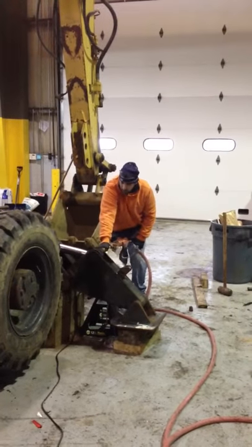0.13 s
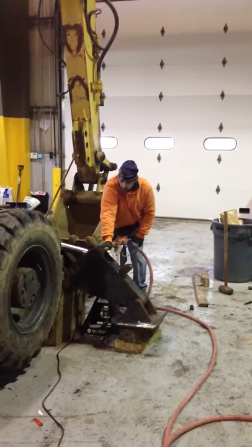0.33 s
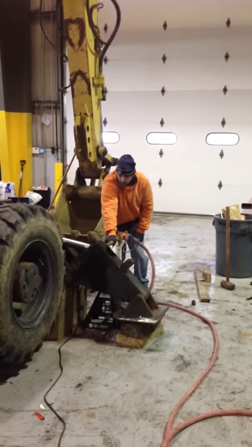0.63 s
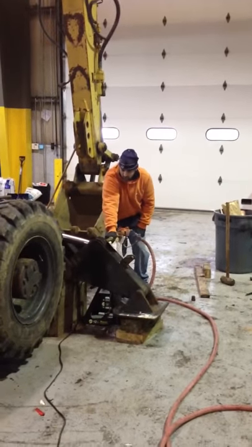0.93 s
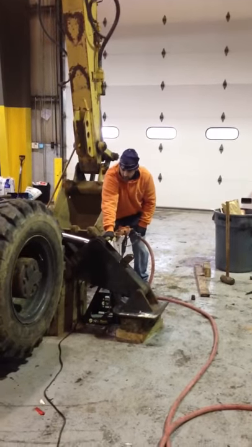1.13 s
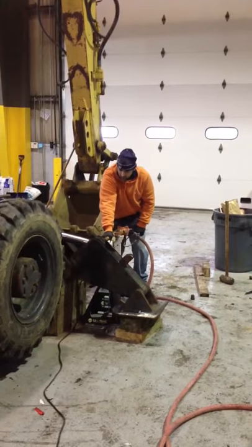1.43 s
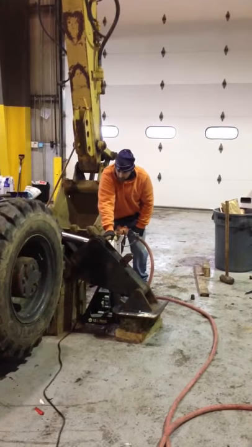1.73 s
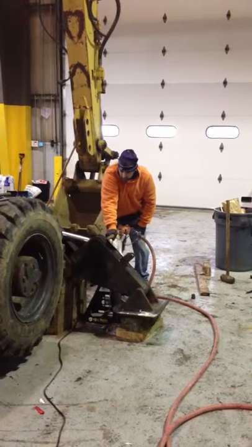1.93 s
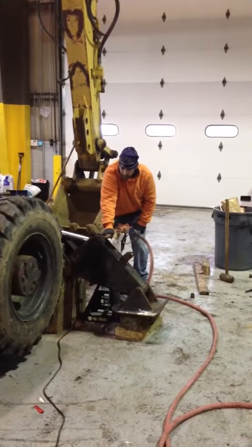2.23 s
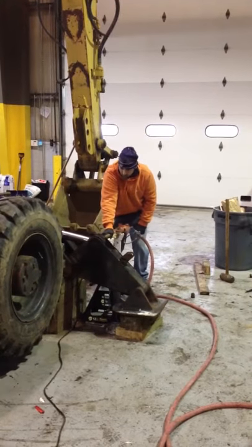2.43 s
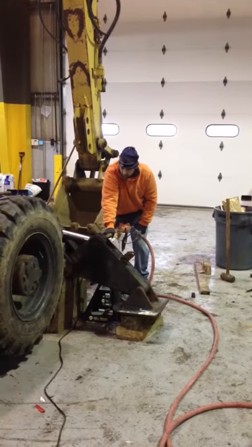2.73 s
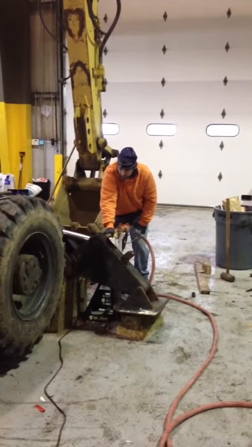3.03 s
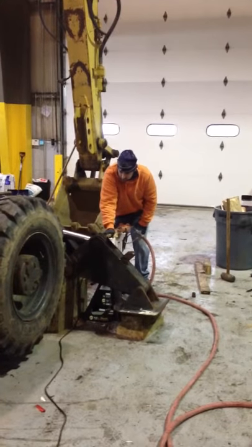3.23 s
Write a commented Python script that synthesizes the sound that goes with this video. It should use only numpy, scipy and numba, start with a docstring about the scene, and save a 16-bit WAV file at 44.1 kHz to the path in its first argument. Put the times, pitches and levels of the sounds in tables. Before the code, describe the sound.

Fast pneumatic blows with sharp metallic clanks and bursts of exhaust air; a short pause leaves ringing, leaking air and low hum, then louder hammering resumes. Reverberant hall, single microphone with automatic level.

```python
"""In a large workshop an air hammer pounds a steel pin on a digger, in two bursts with a short pause.
Each stroke is an impulse that knocks on the steel (noise bursts, damped modes) and vents air twice (puff, jet).
Square hits excite the resonances of the bit and clank the frame; the steelwork and the pin ring on as long modes.
Behind lie an air leak (coloured noise) and mains hum (two sines), which swell in the pause as the
automatic gain recovers."""
import sys
import numpy as np
from scipy import signal
from scipy.fft import rfft, irfft
from scipy.io import wavfile
from scipy.ndimage import uniform_filter1d
from numba import njit

SR = 44100
rng = np.random.default_rng(int(sys.argv[2]) if len(sys.argv) > 2 else 0)


def dump(signal):
    """Clip the signal to [-1, 1] and save it as 16-bit WAV at the path in sys.argv[1]."""
    limited = np.clip(np.atleast_2d(signal).T, -1, 1)
    pcm = np.round(limited * 32767).astype(np.int16)
    wavfile.write(sys.argv[1], SR, pcm)


N = 148617  # length [samples]
T = np.arange(N) / SR  # time [s]


def undb(db):
    """Decibel law: amplitude gain from a level in dB."""
    return 10 ** (np.asarray(db) / 20)


def level(x, db):
    """Mean-square level: scale x to the given rms."""
    return x * undb(db) / np.sqrt(np.mean(x ** 2))


def noise():
    """White noise: equal power at all frequencies."""
    return rng.standard_normal(N)


def walk(rate):
    """Slow random fluctuation: smoothed random steps, rate per second, with a spread near 1."""
    hold = int(SR / rate)
    steps = np.repeat(noise()[:N // hold + 1], hold)
    return level(uniform_filter1d(steps, hold)[:N], 0)


def conv(x, response):
    """Circular convolution: tails wrap round, so the work is already under way at the start."""
    return irfft(rfft(x) * rfft(response, N), N)


def colour(x, points):
    """Minimum-phase filtering: a causal response of the given (frequency [Hz], gain [dB]) curve."""
    hz, db = np.array(points).T
    size = 4096
    f = np.maximum(np.fft.rfftfreq(size, 1 / SR), 1)
    gain = undb(np.interp(np.log(f), np.log(hz), db))
    # folding the cepstrum onto positive time makes the response causal
    cepstrum = irfft(np.log(gain))
    cepstrum[1:size // 2] *= 2
    cepstrum[size // 2 + 1:] = 0
    return conv(x, irfft(np.exp(rfft(cepstrum))))


def taps(events):
    """Impulse excitation: one impulse per (time [s], level [dB]) row."""
    s, db = np.array(events).T
    return np.bincount(np.abs(s * SR).astype(int), undb(db), N)[:N]


def swell(hits, rise_s, fall_s):
    """Energy summation: each impulse rises quickly and decays exponentially, and the energies add."""
    shape = (1 - np.exp(-T / rise_s)) * np.exp(-T / fall_s)
    return np.sqrt(np.abs(conv(hits ** 2, shape ** 2)))


def ring(x, hz, width_hz):
    """Damped resonance: the wider its bandwidth, the faster it decays."""
    return conv(x, np.exp(-np.pi * width_hz * T) * np.sin(2 * np.pi * hz * T))


# runs of even strokes: (first blow [s], last blow [s], rate [blows/s], blow level [dB], exhaust level [dB])
STROKE_RUNS = [(0.019, 0.343, 27.2, 2.5, 1), (0.387, 0.42, 25, -10, -10.5), (0.518, 0.628, 27.1, 2, -2),
               (0.661, 0.791, 29.8, -4.5, 0.5), (0.829, 1.005, 28.6, -4.5, 0.5),
               (1.732, 1.798, 27.4, 7, 4.5), (1.834, 2.151, 27.5, 3, 4), (2.202, 2.488, 28.8, 2, 1.5),
               (2.52, 2.664, 28, 2, 0.5), (2.696, 2.774, 26, -1.5, 3.5), (2.805, 3.121, 28.6, 0.5, -1),
               (3.156, 3.368, 29.2, 0, -0.5)]
JITTER_S, SCATTER_DB = .0008, 2  # random spread of time and level
VENT_DELAY_S = 0.00076
RETURN_SHARE, RETURN_DB = 0.521, -4.5  # second vent: fraction of the cycle, level relative to the first


def strokes():
    """Reciprocating cycle, slightly uneven: a blow and a vent, then a second vent as the piston returns."""
    blows, vents = [], []
    for first, last, rate, blow_db, air_db in STROKE_RUNS:
        count = int(round((last - first) * rate)) + 1
        for s in np.linspace(first, last, count):
            c = rng.standard_normal(5)
            s = s + JITTER_S * c[0]
            back = s + RETURN_SHARE / rate + JITTER_S * c[3]
            blows.append((s, blow_db + SCATTER_DB * c[1]))
            vents.append((s + VENT_DELAY_S, air_db + SCATTER_DB * c[2]))
            vents.append((back, air_db + RETURN_DB + SCATTER_DB * c[4]))
    return taps(blows), taps(vents)


# colour of the blow's crack: (frequency [Hz], relative gain [dB])
KNOCK_COLOUR = [(40, -40), (300, -15), (420, -3), (540, -10.5), (660, -1), (1150, -8), (1600, 0),
                (2200, 0.5), (2800, -29.5), (4500, -3.5), (8000, -7.5), (15500, -21)]
KNOCK_DB, KNOCK_FALL_S = -24, 0.0072
KNOCK_SAME = 0.35  # amplitude of the part alike in every blow, relative to the fresh part


def knock(blows):
    """High modal density: heavy steel rings as short dense noise, partly alike from blow to blow."""
    alike = conv(blows, noise() * np.exp(-T / KNOCK_FALL_S))
    fresh = noise() * swell(blows, 0.00073, KNOCK_FALL_S)
    crack = KNOCK_SAME * level(alike, 0) + level(fresh, 0)
    return level(colour(crack, KNOCK_COLOUR), KNOCK_DB)


# damped resonances that answer every blow: (frequency [Hz], bandwidth [Hz], relative level [dB])
THUD_MODES = [(398, 156, -4), (644, 60, -1), (813, 90, 0), (1040, 85, -9)]
THUD_DB = -29


def thud(blows):
    """Modal response: each blow excites a few low, strongly damped modes of the steel."""
    push = np.diff(blows, prepend=0)
    total = 0
    for k, (hz, width_hz, db) in enumerate(THUD_MODES):
        total = total + (-1) ** k * level(ring(push, hz, width_hz), db)  # alternating polarity
    return level(total, THUD_DB)


# square hits: (time [s], clang of the bit [dB], clank of the steel [dB])
SQUARE_HITS = [(0.024, 6, 6), (0.126, 0.5, 7.5), (0.165, 3, -12), (0.205, 7.5, 7), (.239, 4, 9),
               (0.382, 3, 3), (0.515, -5, 3), (0.555, -7, 8), (0.626, -0.5, 5), (0.726, -1, 0.5),
               (.794, 4, 2.5), (.900, 5.5, -12), (0.939, -0.5, 10.5), (1.733, -10, 13), (1.763, 4, 7),
               (1.798, -0.5, 6), (1.833, 3.5, 12.5), (1.874, -7, 9), (1.909, 9.5, -14), (1.946, 7, 9),
               (2.01, 8, 11.5), (2.152, -2, 10.5), (2.210, 2, 1), (2.244, 7.5, 11), (2.346, 1, 11.5),
               (2.455, 0, 9.5), (2.528, 3, 1), (2.602, 7, 6), (2.667, 5, 5), (2.738, -7, 9), (2.840, 3, -3),
               (2.91, 4.5, 0), (2.982, 2.5, -4), (3.051, 2.5, -4.5), (3.122, -4, 9), (3.159, 0, 6),
               (3.196, 1, 6), (3.261, -3, 10.5), (3.331, 1.5, -8)]


def square_hits():
    """Impulse excitation: each square hit drives the bit and the steel frame at separate levels."""
    clangs = taps([(s, db) for s, db, _ in SQUARE_HITS])
    clanks = taps([(s, db) for s, _, db in SQUARE_HITS])
    return clangs, clanks


# colour of the clank: (frequency [Hz], relative gain [dB])
CLANK_COLOUR = [(40, -20), (300, -13), (600, -1), (1250, -3), (1550, -0.5), (2200, -1), (2800, -12),
                (4500, -3.5), (15500, -29.5)]
CLANK_DB, CLANK_RISE_S, CLANK_FALL_S = -25, 0.0029, 0.018


def clank(hits):
    """Structure-borne sound: a square hit shakes the whole frame, longer than a knock."""
    shake = noise() * swell(hits, CLANK_RISE_S, CLANK_FALL_S)
    return level(colour(shake, CLANK_COLOUR), CLANK_DB)


# resonances of the bit: (frequency [Hz], bandwidth [Hz], relative level [dB])
BIT_MODES = [(1670, 170, -20.5), (3430, 100, -6.5), (5290, 740, 9.5), (5900, 720, 5), (6187, 150, 12.5),
             (6550, 110, -14)]
BIT_DB, BIT_RISE_S, BIT_FALL_S = -20.5, 0.0038, 0.014


def bit(clangs):
    """Forced resonance: the bit chatters on a square hit and sounds its damped modes."""
    chatter = noise() * swell(clangs, BIT_RISE_S, BIT_FALL_S)
    modes = [level(ring(chatter, hz, width_hz), db) for hz, width_hz, db in BIT_MODES]
    return level(sum(modes), BIT_DB)


# extra spurts of air, beside the regular vents: (time [s], level [dB])
AIR_SPURTS = [(.342, 4), (.456, 3.5), (.496, 3.5), (1.673, -6), (1.715, 6)]
# colour of the exhaust's puff: (frequency [Hz], relative gain [dB])
PUFF_COLOUR = [(30, -57), (80, -47), (125, -13.5), (165, -8.5), (220, -1), (280, 2), (330, -10),
               (500, -14.5), (1500, -27.5)]
# colour of the exhaust's jet: (frequency [Hz], relative gain [dB])
JET_COLOUR = [(40, -81), (200, 8), (600, -1.5), (1100, 1), (2000, 1), (3500, 6), (4200, -0.5), (7000, 5),
              (9500, 1), (11500, 6.5), (15500, 3)]
PUFF_DB, PUFF_FALL_S = -25, 0.0088
JET_DB, JET_FALL_S = -20, 0.0097


def exhaust(vents):
    """Monopole and jet noise: released air gives a low pressure puff and a hiss of turbulence."""
    spurts = taps(AIR_SPURTS)
    push = conv(vents + 0.55 * spurts, np.exp(-T / .0006))
    rush = noise() * swell(vents, .001, PUFF_FALL_S)
    puff = level(push, 0) + 1.2 * level(rush, 0)
    jet = noise() * swell(vents + spurts, .0004, JET_FALL_S)
    return level(colour(puff, PUFF_COLOUR), PUFF_DB), level(colour(jet, JET_COLOUR), JET_DB)


FLUTTER_DB = 3  # random spread of a mode's level


def wavering_tone(hz, waver_hz):
    """Frequency and amplitude modulation: a sine whose pitch and level waver at random."""
    phase = 2 * np.pi * np.cumsum(hz + waver_hz * walk(70)) / SR
    return np.sin(phase) * undb(FLUTTER_DB * walk(110))


# modes of the steelwork: (frequency [Hz], relative level [dB])
STEEL_MODES = [(650, -6.5), (1020, -7.5), (1438, -4), (1790, -9), (2200, -9.5), (3304, -6.5), (3365, -2.5),
               (3245, -9), (3400, -6), (3656, -6), (3790, -7), (4910, -6), (5080, -6), (5330, -18),
               (5688, -32), (5956, -23), (6300, -10), (6624, 1.5), (8550, -7), (8950, -1), (10670, -0.5)]
STEEL_DB, STEEL_T60_S = -26, 0.87
STEEL_WAVER = 0.00346  # spread of pitch, as a fraction of the frequency


def steelwork(blows):
    """Lightly damped modes: successive blows keep the long wavering partials ringing."""
    modes = sum(undb(db) * wavering_tone(hz, STEEL_WAVER * hz) for hz, db in STEEL_MODES)
    return level(modes * swell(blows, 0.0015, STEEL_T60_S / np.log(1000)), STEEL_DB)


# relative level of the pin's ring over time: (time [s], level [dB])
PIN_RING_LEVEL = [(0, -7), (.3, -11), (.42, 1), (.53, -3), (.62, 6), (.75, -4), (.85, 4), (1.0, -2),
                  (1.18, 8), (1.5, 8), (1.75, -1.5), (1.93, 3.5), (2.12, -4), (2.26, 3), (2.4, -2.5),
                  (2.6, 2.5), (2.75, -8), (2.95, -2.5), (3.15, -6), (3.37, -28)]
PIN_HZ, PIN_WAVER_HZ, PIN_DB, PIN_T60_S = 4410, 8.4, -25.5, 1.03
PIN_KICK, PIN_KICK_S = 1.7, 0.004  # amplitude relative to the long ring, decay time


def pin_note(blows):
    """Single-mode ringing: each blow gives the pin's note a brief kick and a long decay."""
    long_ring = swell(blows, 0.0016, PIN_T60_S / np.log(1000))
    kick = PIN_KICK * swell(blows, 0.0022, PIN_KICK_S)
    s, db = np.array(PIN_RING_LEVEL).T
    struck = (long_ring + kick) * undb(np.interp(T, s, db))
    return level(wavering_tone(PIN_HZ, PIN_WAVER_HZ) * struck, PIN_DB)


ROOM_LOW_T60_S = 1.53  # reverberation time towards low frequencies
ROOM_DAMP_HZ = 14000  # where the reverberation time has halved
ROOM_GAP_S = .012  # silence before the echo


def workshop(x):
    """Diffuse reverberation: noise decays exponentially in bands, and the treble dies sooner."""
    f = np.fft.rfftfreq(N, 1 / SR)
    spectrum, tail = rfft(noise()), 0
    edges = [0, 500, 1500, 3000, 6000, 10000, 22050]  # bands [Hz]
    for lo, hi in zip(edges, edges[1:]):
        t60 = ROOM_LOW_T60_S / (1 + ((lo + hi) / 2 / ROOM_DAMP_HZ) ** 2)
        band = irfft(spectrum * (f >= lo) * (f < hi), N)
        tail = tail + band * np.exp(-np.log(1000) * T / t60)
    tail = tail * (T > ROOM_GAP_S)
    return conv(x, tail / np.sqrt(np.sum(tail ** 2)))


# colour of the air leak: (frequency [Hz], relative gain [dB])
LEAK_COLOUR = [(25, -45), (70, -4), (170, 7), (300, 3), (500, -47), (1100, -15), (1900, -8), (2600, -5),
               (3400, 3.5), (4100, -4), (5000, -0.5), (6500, 0.5), (8500, -6), (11000, -0.5), (15500, -2.5)]
LEAK_DB = -32.5
HUM_HZ, HUM_DB, OVERTONE_DB = 98.8, -36.5, -21  # overtone relative to the fundamental


def background():
    """Turbulence and harmonic hum: a nearly steady air leak, and a machine's mains hum with one overtone."""
    leak = colour(noise(), LEAK_COLOUR) * undb(.5 * walk(8.1))
    phase = 2 * np.pi * HUM_HZ * T
    hum = np.sin(phase) + undb(OVERTONE_DB) * np.sin(2 * phase)
    return level(leak, LEAK_DB) + level(hum, HUM_DB)


# gain of each source into the echo
KNOCK_ROOM_DB, BIT_ROOM_DB, JET_ROOM_DB, PUFF_ROOM_DB, STEEL_ROOM_DB = -6, -7, 0.5, -16, 0.5


def scene():
    """Superposition: hammer, steel and exhaust, direct and echoed, over the background."""
    blows, vents = strokes()
    clangs, clanks = square_hits()
    knocks = knock(blows) + thud(blows) + clank(clanks)
    puff, jet = exhaust(vents)
    layers = [(knocks, KNOCK_ROOM_DB), (bit(clangs), BIT_ROOM_DB), (jet, JET_ROOM_DB),
              (puff, PUFF_ROOM_DB), (steelwork(blows), STEEL_ROOM_DB)]
    direct = sum(x for x, _ in layers) + pin_note(blows)  # the pin's note stays out of the echo
    echo = workshop(sum(undb(db) * x for x, db in layers))
    return (direct + echo + background())[None]


@njit
def follow(power, start, attack, release):
    """Exponential averaging: a level detector that rises fast and falls slowly."""
    out, e = np.empty(len(power)), start
    for i in range(len(power)):
        e += (power[i] - e) * (attack if power[i] > e else release)
        out[i] = e
    return out


AGC_DB, AGC_MAX_DB, OUT_DB = -13.5, 6, 3.5  # target level, greatest automatic gain, fixed gain after it
AGC_ATTACK_S, AGC_RELEASE_S, AGC_AHEAD_S = 0.0047, 0.23, 0.0024
TOP_HZ = 15550  # upper band limit


def record(dry):
    """Automatic gain control that looks slightly ahead, soft saturation and a steep low-pass filter."""
    power = np.roll(uniform_filter1d(dry[0] ** 2, size=128), -int(AGC_AHEAD_S * SR))
    target = float(undb(AGC_DB) ** 2)
    # the detector starts above its target, as if work had gone on before
    held = follow(power, 3.86 * target, 1 / (AGC_ATTACK_S * SR), 1 / (AGC_RELEASE_S * SR))
    gain = np.minimum(np.sqrt(target / held), undb(AGC_MAX_DB)) * undb(OUT_DB)
    top_cut = signal.ellip(10, .2, 80, TOP_HZ, fs=SR, output="sos")
    return signal.sosfilt(top_cut, np.tanh(dry * gain))


dry = scene()
out = record(dry)
dump(out)
```